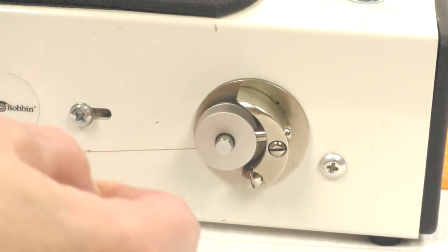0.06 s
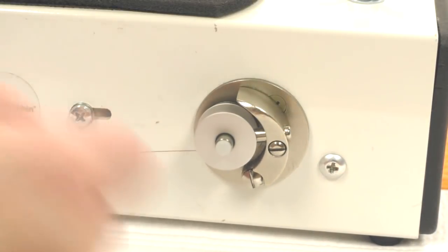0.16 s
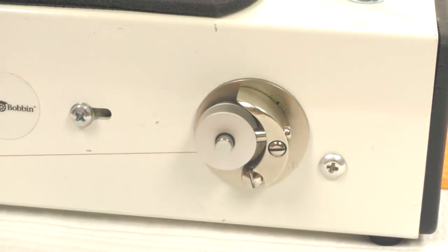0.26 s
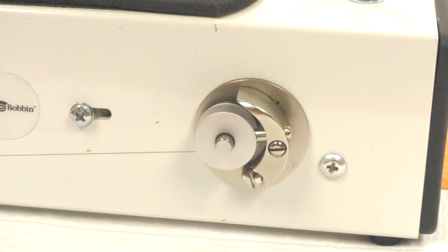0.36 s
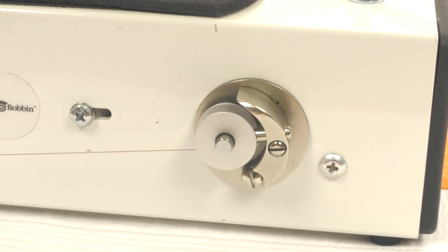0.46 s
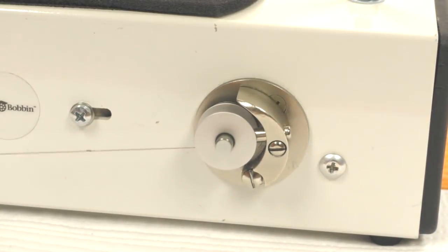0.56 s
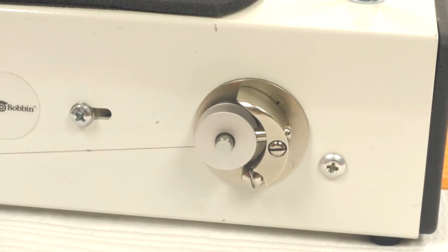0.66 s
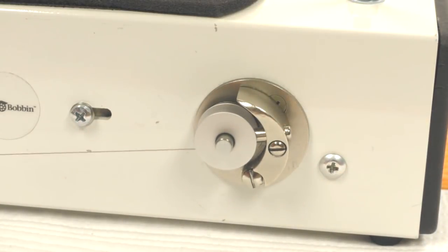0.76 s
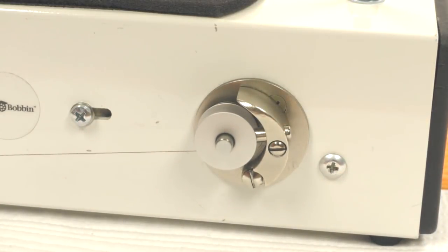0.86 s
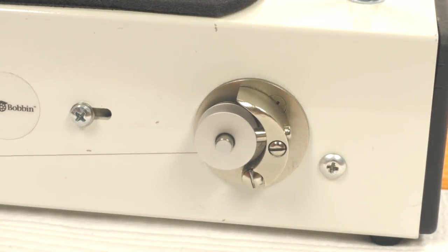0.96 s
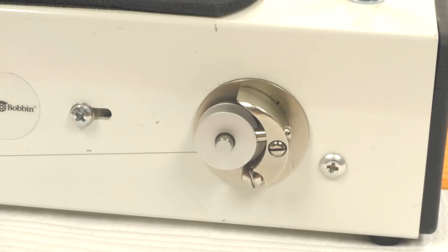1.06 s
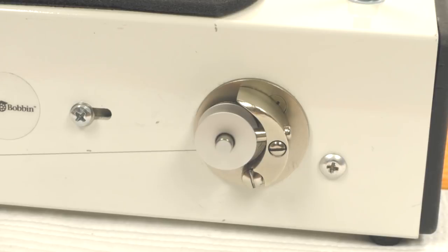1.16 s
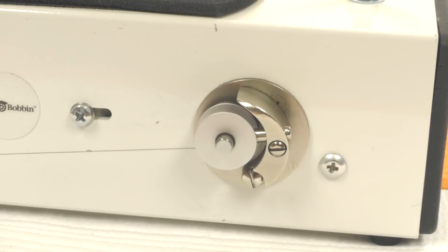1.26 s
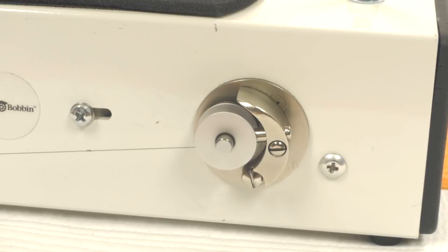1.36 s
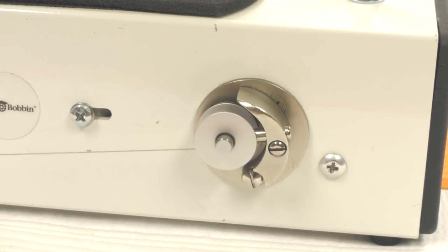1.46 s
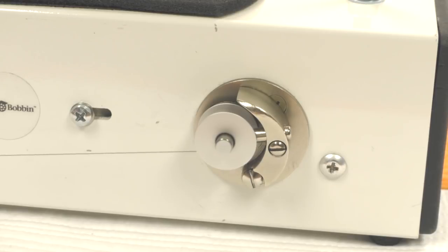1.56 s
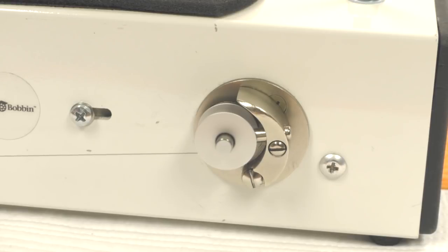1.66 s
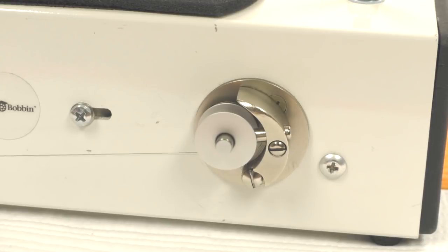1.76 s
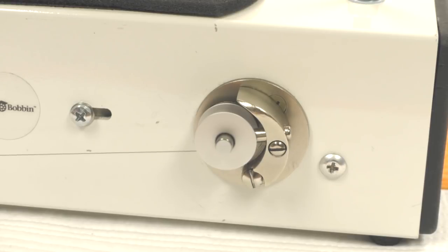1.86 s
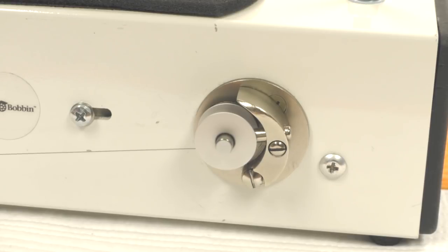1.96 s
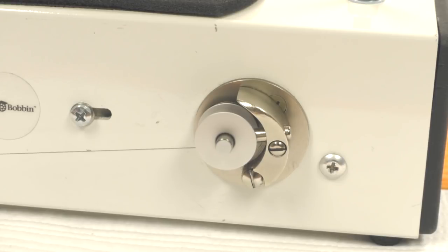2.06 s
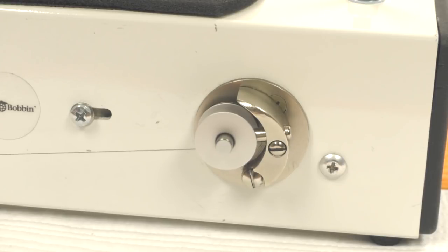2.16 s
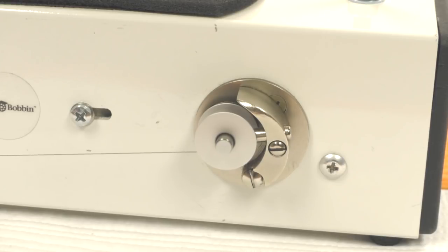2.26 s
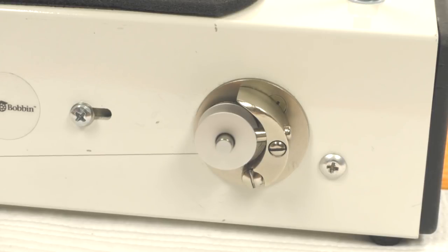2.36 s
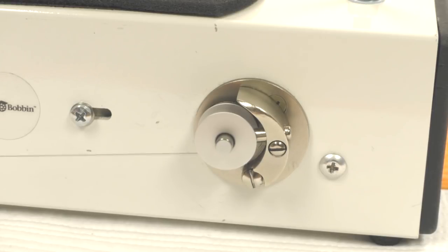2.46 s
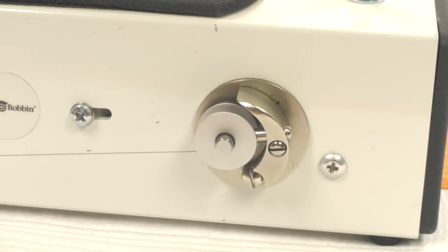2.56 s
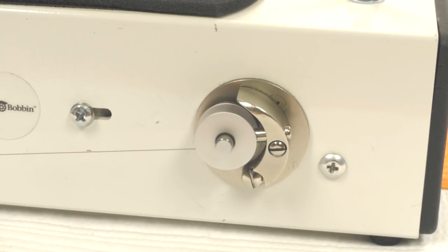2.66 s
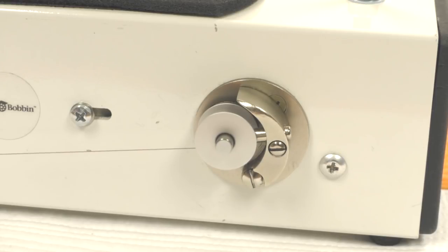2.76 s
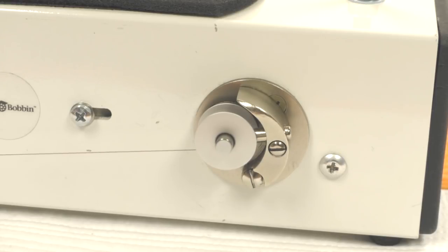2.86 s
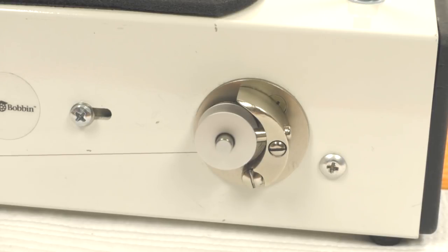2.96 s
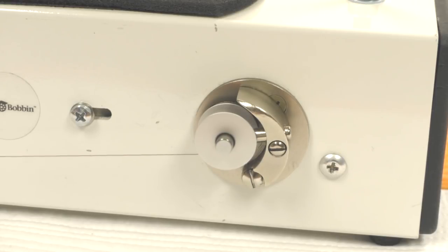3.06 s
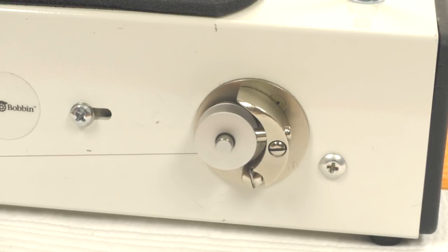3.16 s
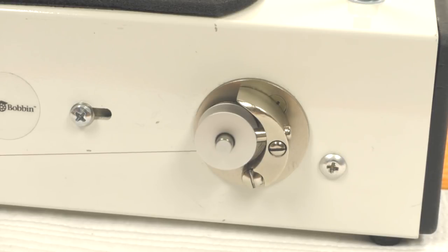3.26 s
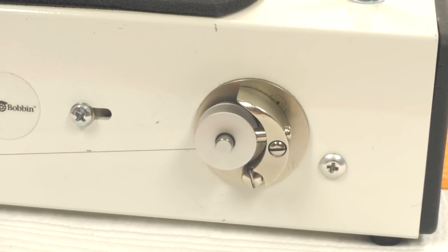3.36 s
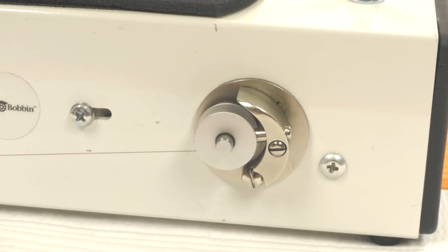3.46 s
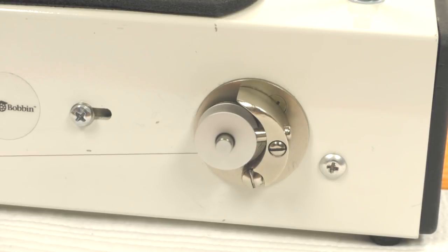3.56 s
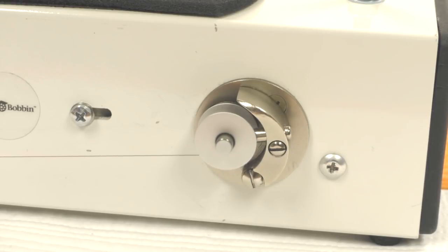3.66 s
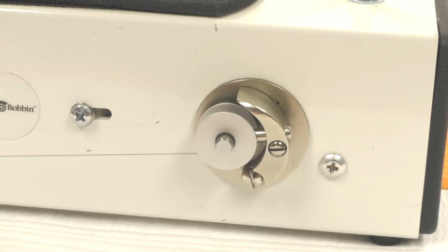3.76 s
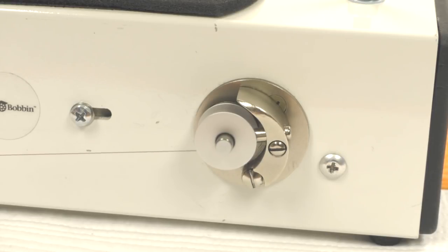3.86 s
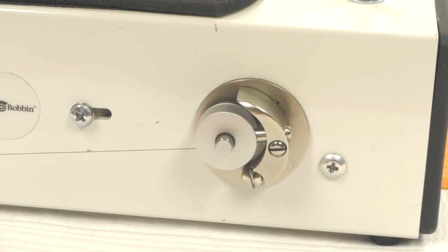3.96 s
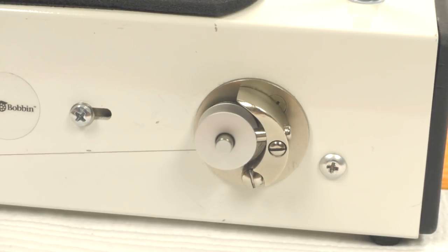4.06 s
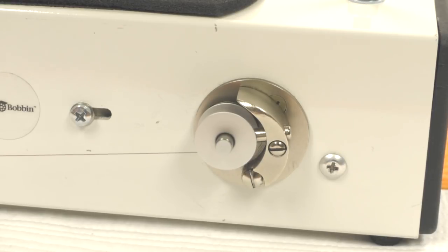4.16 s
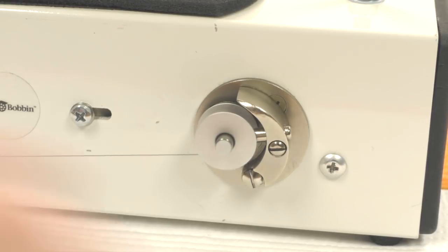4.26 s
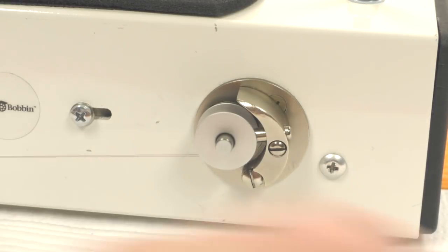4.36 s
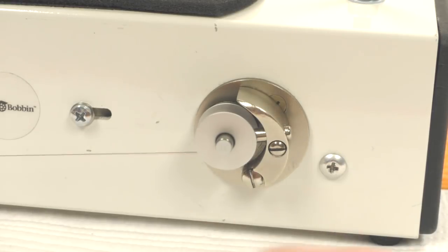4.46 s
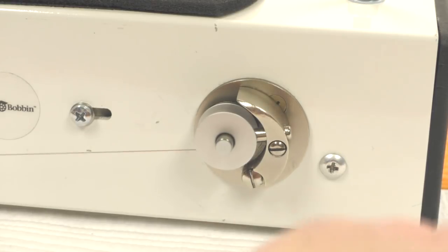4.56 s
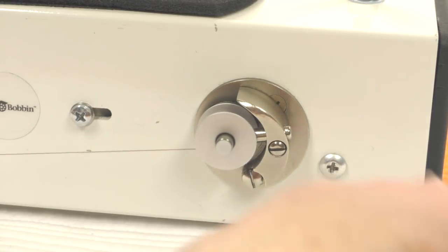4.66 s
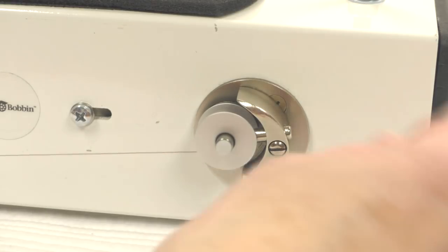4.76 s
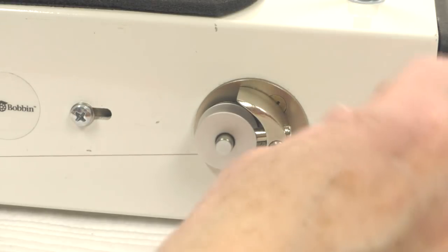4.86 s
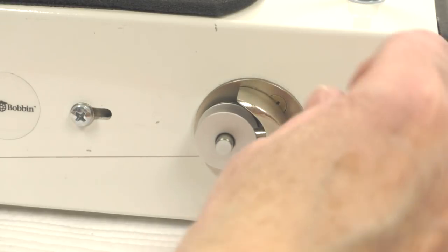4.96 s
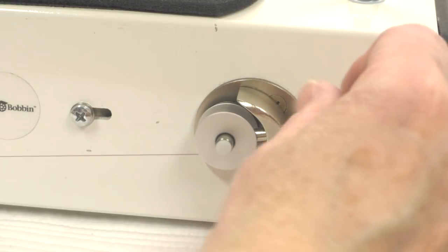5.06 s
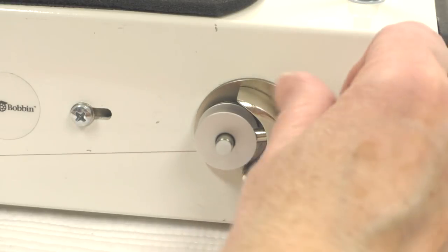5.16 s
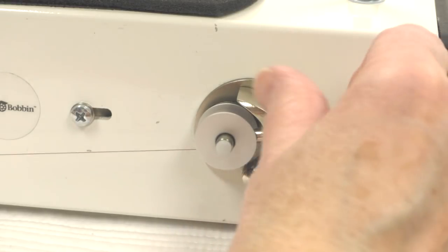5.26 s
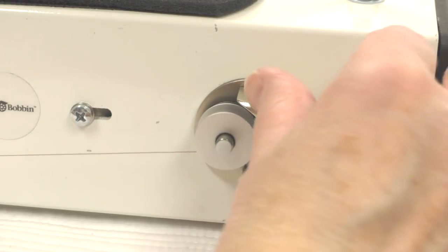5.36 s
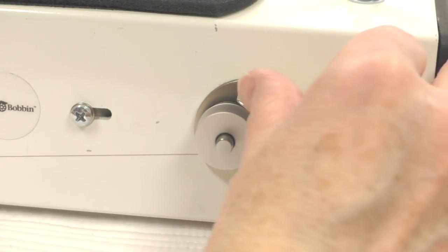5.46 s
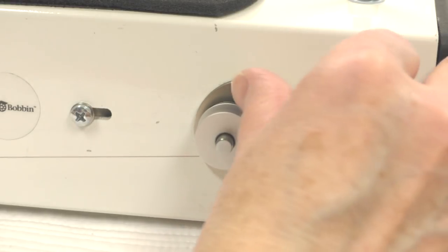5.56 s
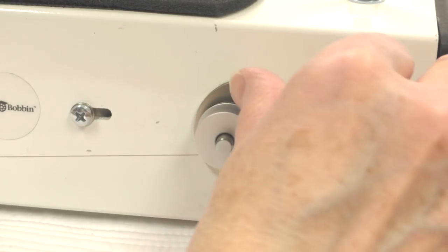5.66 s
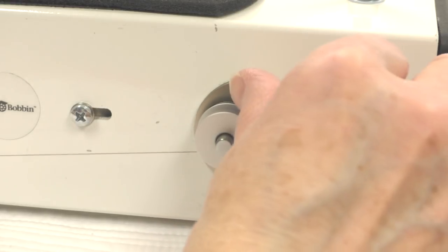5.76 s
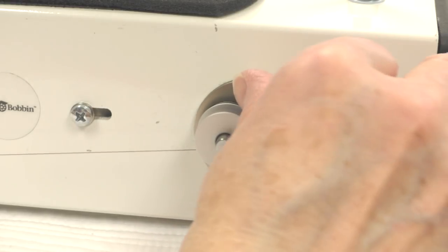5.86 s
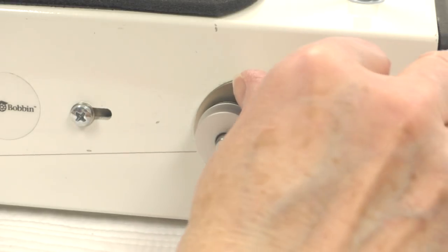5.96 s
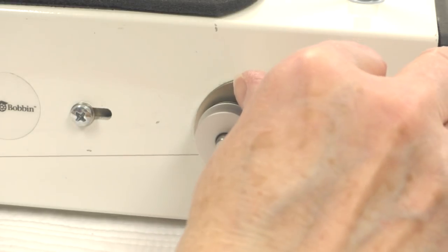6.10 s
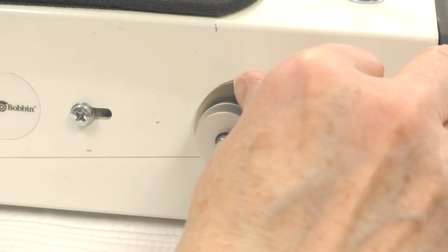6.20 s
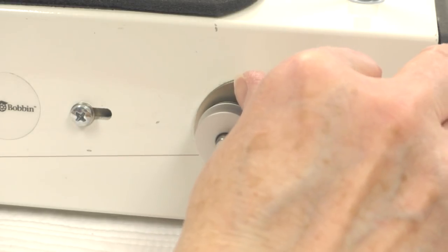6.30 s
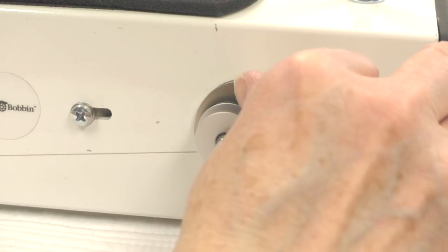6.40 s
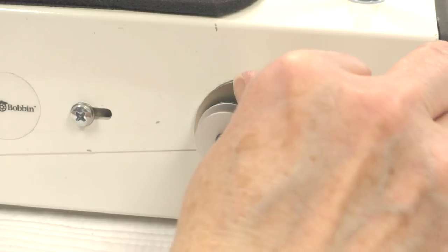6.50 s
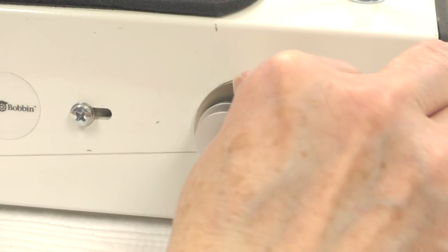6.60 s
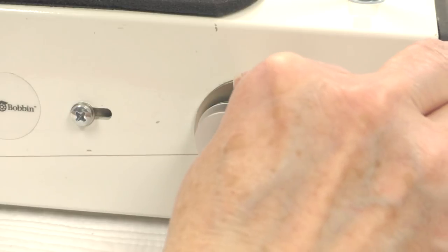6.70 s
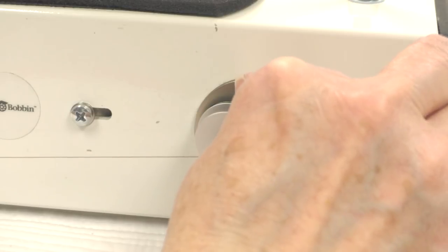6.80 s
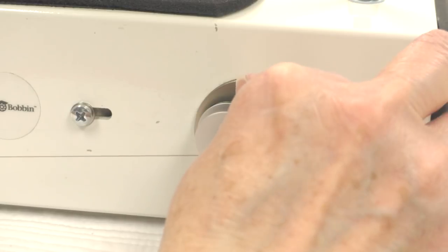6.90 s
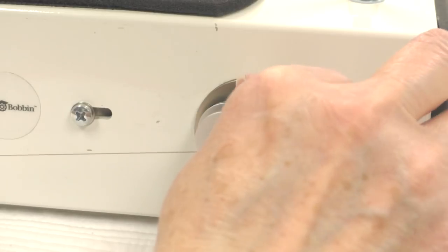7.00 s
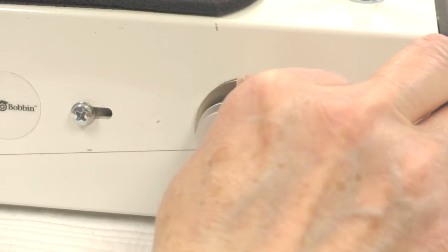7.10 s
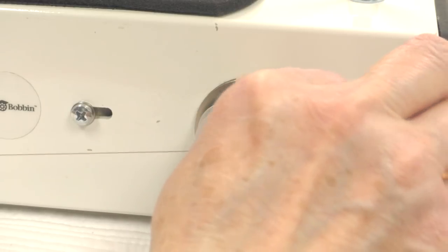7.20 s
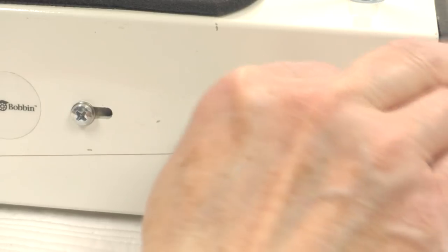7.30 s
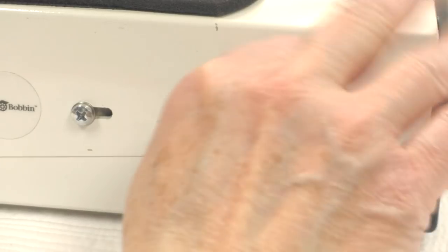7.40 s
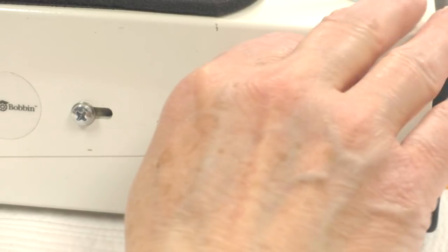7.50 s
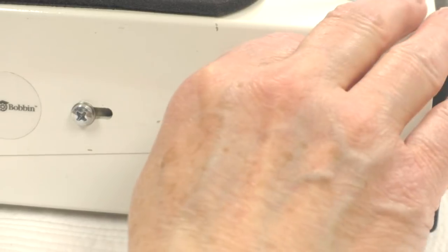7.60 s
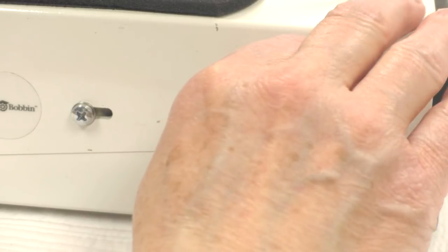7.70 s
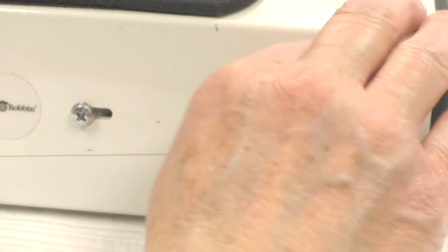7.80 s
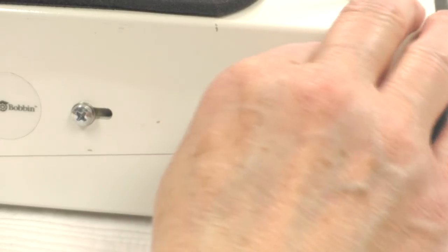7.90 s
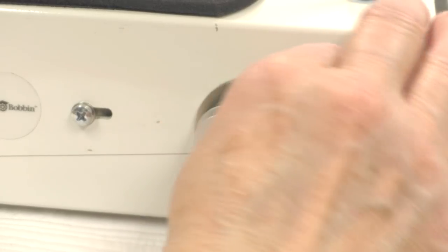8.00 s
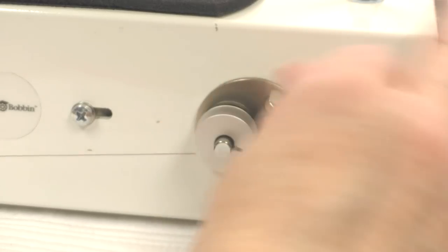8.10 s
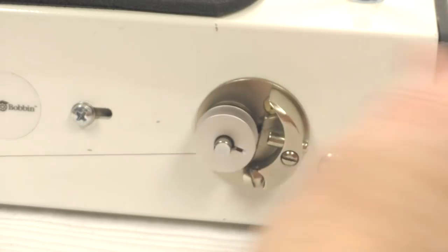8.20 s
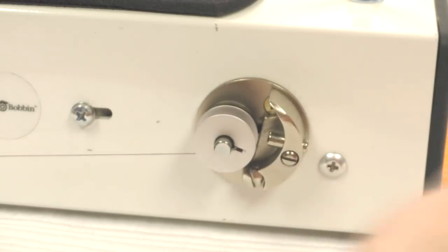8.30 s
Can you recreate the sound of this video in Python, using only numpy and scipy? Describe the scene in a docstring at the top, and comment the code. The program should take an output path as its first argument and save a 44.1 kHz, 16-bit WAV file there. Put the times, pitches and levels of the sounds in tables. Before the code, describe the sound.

Steady metallic motor whir with fine rattle and pulsing, gritty thread buzz, a few light knocks, then a sharp clack and falling whine.

```python
"""A belt-driven bobbin winder whirs close by, its bearings rattling in a sheet-metal case as it slowly gains speed.
Thread hisses through its guide and ticks once per spindle turn each time it sweeps across the bobbin.
Loose parts knock, skin brushes, hands bump the machine now and then, and one comes to rest on the trip lever.
The lever snaps over, the power is cut and the motor coasts down with a thin falling whine.
Behind it all lie a low rumble, still room air and a faint high tone."""
import sys
import numpy as np
from scipy import signal
from scipy.fft import rfft, irfft, next_fast_len
from scipy.io import wavfile
from scipy.ndimage import map_coordinates

SR = 44100
rng = np.random.default_rng(int(sys.argv[2]) if len(sys.argv) > 2 else 0)


def generate_wav(sig):
    """Save sig (samples, or channels by samples) to the path in sys.argv[1] as 16-bit PCM at SR."""
    pcm = np.round(np.clip(np.atleast_2d(sig).T, -1, 1) * 32767).astype(np.int16)
    wavfile.write(sys.argv[1], SR, pcm)


N = 367838
TIME = np.arange(N) / SR  # seconds

# The thread sweeps across the bobbin.
# Each row: middle in seconds, length in seconds, relative level of the ticks in dB.
SWEEPS = [(0.08, 0.32, -53), (0.71, 0.55, -52.5), (1.442, 0.56, -52), (2.12, 0.53, -51.5),
          (2.84, 0.5, -51.5), (3.457, .3, -51), (4.046, 0.36, -49), (4.58, 0.27, -53.5), (5.333, 0.32, -54),
          (6.003, 0.55, -50), (6.573, 0.41, -48.5), (7.174, 0.4, -52), (7.783, .2, -49)]

# Smooth changes that several sounds share: (start, length) in seconds
TOUCH = (3.62, 2.14)  # the hand settles on the machine
PRESS = (4.65, .3)  # it bears on the lever


def shaft_speed():
    """Turns per second: a slow climb under power, steady braking after the cut."""
    cut_s = 7.85
    start_hz, creep_hz_per_s, braking_hz_per_s = 205.3, 2.14, 154
    start_lag_hz, settle_s = 3.4, .2  # a little slow just after the start
    powered = np.minimum(TIME, cut_s)
    lag = start_lag_hz * np.exp(-powered / settle_s)
    return start_hz + creep_hz_per_s * powered - lag - braking_hz_per_s * (TIME - powered)


def rattle(turns, lap_share=.52, scatter_db=4.4, hits_per_lap=300):
    """Tiny impacts ring the case: some repeat with each lap of the belt, the rest fall by chance."""
    # How the case responds. Each row: pitch in Hz, relative level in dB.
    case_response = [(120, -37), (320, -32.5), (385, -17), (480, -28.5), (570, -12), (740, -14), (880, -13),
                     (1040, -4.5), (1370, -15.5), (1560, -2.5), (1830, 1), (2120, -10), (2480, -25.5),
                     (4400, -54.5)]
    belt = turns * .1083  # belt laps per shaft turn
    laps = np.arange(int(belt[-1]) + 1)[:, None]
    # Every lap has its hits at the same places, with sizes that vary somewhat
    places = laps + rng.random(hits_per_lap)
    place_db = 3.4 * rng.standard_normal(hits_per_lap)
    lap_db = 3.5 * rng.standard_normal(places.shape)
    bumps = rng.choice([-1, 1], hits_per_lap) * amp(place_db + lap_db)
    repeating = unit(impulses(belt, places.ravel(), bumps.ravel()))
    # As many more fall anywhere
    loose_db = scatter_db * np.clip(rng.standard_normal(places.size), -3, 3)
    sizes = rng.choice([-1, 1], places.size) * amp(loose_db)
    loose = unit(impulses(belt, rng.random(places.size) * belt[-1], sizes))
    tension = amp(0.95 * np.sin(4 * np.pi * belt))  # the belt tightens twice a lap
    mixed = lap_share * repeating + np.sqrt(1 - lap_share ** 2) * loose
    return coloured(tension * mixed, case_response)


def bearings(turns):
    """Rolling tones that waver as the balls slip and change balance under the hand."""
    # Tones of the bearings and spindle. Each row: multiple of the shaft rate,
    # level in dB against the rattle when running free, level in dB under the hand.
    rolling_tones = [(.87, -44.5, -40.5), (1.739, -33, -40.5), (2.087, -32.5, -38), (2.6, -26, -33),
                     (2.708, -23.5, -23.5), (3.02, -24, -30), (3.56, -23.5, -32), (3.79, -28, -28.5),
                     (4.54, -25, -21), (4.655, -32, -25.5), (5.3, -19, -27.5), (6.82, -19, -39),
                     (7.25, -20, -24), (7.67, -22, -14), (8.33, -22, -24), (8.66, -18, -11),
                     (8.78, -13, -25)]
    held, out = change(*PRESS), np.zeros(N)
    for multiple, free_db, held_db in rolling_tones:
        level = amp(free_db + (held_db - free_db) * held + 2.66 * wobble(5))
        phase = 2 * np.pi * multiple * turns + .5 * wobble(9)
        out += np.sqrt(2) * level * np.sin(phase)
    return out


def rattle_level(drift_db=0.27):
    """The case rattles harder while fingers hold the thread taut or bear on the lever; a fuller bobbin calms it."""
    rattle_db, calming_db_per_s = -31, 0.1853
    taut_db, pressed_db, push_db = 1.5, 3.7, 2  # what each adds
    let_go = change(0.39, .14)  # the fingers release the thread
    push = change(4.99, 0.47) * (1 - change(5.38, 0.42))  # one firm push, then it relaxes
    free_db = rattle_db - calming_db_per_s * TIME + drift_db * wobble(4.01)
    return amp(free_db + taut_db * (1 - let_go) + pressed_db * change(*PRESS) + push_db * push)


def engagement(slip_s=.014):
    """The drive is at 1 while engaged; when it lets go it drops at once, then dies away."""
    release_s, drop_db, fade_db_per_s = 7.862, 6, 210
    since = np.maximum(TIME - release_s, 0)
    return amp(-drop_db * change(release_s, slip_s) - fade_db_per_s * since)


def whine(turns, speed, count=80):
    """Harmonics of the shaft, each with its own random rise and fall in level as its pitch glides."""
    # Hum at twice the shaft rate. Each row: time in seconds, level in dB.
    hum_level = [(0, -43), (.9, -49), (2, -47), (4, -55), (7.8, -55.5), (8.34, -77)]
    # Typical strength of a harmonic. Each row: pitch in Hz, level in dB.
    whine_level = [(200, -71), (430, -82), (580, -58), (750, -70), (1250, -76), (1650, -63.5),
                   (1950, -68.5), (2400, -74.5), (3000, -81), (4700, -99), (6500, -87), (9300, -81),
                   (11000, -104), (15800, -103)]
    # Commutator harmonics set apart from the rest.
    # Each row: multiple of the shaft rate, extra level in dB.
    slots = [(3, 6.5), (4, -0.5), (8, 7.5), (9, -3), (10, -1), (11, 8.5), (12, 10), (13, 8.5), (14, -3),
             (15, -4), (16, 4), (17, 3), (18, -3), (19, 1), (20, -3), (21, -4), (22, -4), (24, 11),
             (36, 10), (48, 4)]
    extra = {round(k): db for k, db in slots}
    hum_amp = amp(curve(hum_level) + 0.76 * wobble(8.8))
    tone = np.sqrt(2) * hum_amp * np.sin(4 * np.pi * turns)
    coarse = slice(None, None, SR // 100)  # levels are worked out 100 times a second
    grid = np.arange(0, SR / 2, 170)  # Hz from one random level to the next
    depth_db = np.interp(grid, [600, 1500, 3000], [1, 4, 5.5])
    for k in range(1, count + 1):
        hz = k * speed[coarse]
        # a fresh random set of levels against pitch for each harmonic
        ripple = depth_db * np.clip(rng.standard_normal(len(grid)), -2, 1.2)
        own_db = extra.get(k, rng.uniform(-6, 3))
        level = amp(along(whine_level, hz) + own_db + np.interp(hz, grid, ripple))
        wave = np.sin(2 * np.pi * (k * turns + rng.random()))
        tone += np.sqrt(2) * np.interp(TIME, TIME[coarse], level) * wave
    return tone


def thread_hiss(grain_db=3.0):
    """Thread rubs through its guide; the colour shifts as the bobbin fills and the lever bears on it."""
    # Hiss on the nearly bare bobbin, the half full one, and under the hand.
    # Each row: pitch in Hz, relative level in dB.
    bare_hiss = [(1500, 0), (2600, 10), (3250, -6.5), (3650, 1.5), (4200, 0.5), (5100, 4.5), (5800, 5),
                 (7200, 7.5), (8200, -2), (9300, -5), (10500, -13), (13500, -29), (15800, -33)]
    half_hiss = [(1500, -4), (2600, -11), (3100, -1.5), (3500, 1), (4100, -7.5), (4900, 1.5), (5800, -4),
                 (8400, 2.5), (9200, -3.5), (10200, -31), (14000, -29), (15800, -20)]
    held_hiss = [(1500, -10.5), (2600, 9), (3050, 3), (3450, 4.5), (4500, -6), (4950, 1), (5900, -3.5),
                 (7550, 5.5), (9100, 1.5), (10500, -14), (12200, -18), (13300, -28), (15800, -20)]
    # Narrow peaks and dips of the case and plate. # Each row: pitch in Hz, width in Hz, level in dB against the
    # hiss.
    case_peaks = [(3040, 66, 4.5), (3120, 85, -0.5), (3430, 240, 5), (3400, 59, 2), (4950, 120, 3.5),
                  (5500, 150, 2.5), (6300, 140, 3.5), (6860, 180, 2.5), (7500, 190, 1.5), (8600, 220, 2)]
    rub = rng.standard_normal(N) * amp(grain_db * wobble(1500))
    peaks = np.zeros(N)
    for hz, width, db in case_peaks:
        b, a = signal.iirpeak(hz, hz / width, SR)
        peaks += (amp(db) - 1) * signal.lfilter(b, a, rub)
    rub = rub + peaks
    # The same rubbing, shifted in time so that the three do not line up
    bare = amp(-48.5) * coloured(rub, bare_hiss)
    half = amp(-51.5) * coloured(np.roll(rub, SR), half_hiss)
    pressed = amp(-43.5) * coloured(np.roll(rub, 2 * SR), held_hiss)
    sweeping = sum(swell(s, length) for s, length, _ in SWEEPS)
    sweep_gain = amp(0.3 * (sweeping - .5))  # slightly louder at the height of a sweep
    return sweep_gain * np.sum(stages() * [bare, half, pressed], axis=0)


def thread_ticks(turns, tick_t60=0.0014, width_hz=1100, skirt_db=-4, drag=0.04, uneven_db=0.5, hand_uneven_db=4.8):
    """The thread drags and flicks once per spindle turn while it sweeps the bobbin, less evenly under the hand."""
    # Top edge of the flicks on the bare bobbin, the filled one, and under the hand.
    # Each row: pitch in Hz, relative level in dB.
    edge_bare = [(6000, -18), (9400, 4), (11000, -9), (13000, -6), (14500, -16), (15800, -3)]
    edge_full = [(6000, -17), (9400, -5), (10600, -37), (11800, -25), (13500, 2), (15700, 44)]
    edge_held = [(6000, -10.5), (9400, 9), (11000, -3.5), (12200, -3), (13300, -14), (14500, -7),
                 (15700, -1)]
    # Per stage: pitch of the flick's ring in Hz, then level of its bright edge in dB against the ring.
    ring_pitches = [7180, 8220, 7720]
    edge_levels = [-7, -10, -6]
    spindle = turns * .3478  # pulley ratio
    at = np.arange(int(spindle[-1]))
    unevenness_db = uneven_db + hand_uneven_db * np.interp(at, spindle, change(*TOUCH))
    flick_db = unevenness_db * np.clip(rng.standard_normal(len(at)), -2, 1.6)
    flicks = impulses(spindle, at, amp(flick_db))
    t = np.arange(SR // 50) / SR
    fading = signal.fftconvolve(flicks, amp(-60 * t / tick_t60))[:N]
    bursts = (drag + fading) * rng.choice([-1, 1], N)  # gritty noise
    ticks = np.zeros(N)
    edges = [edge_bare, edge_full, edge_held]
    for gain, ring_hz, edge_db, edge in zip(stages(), ring_pitches, edge_levels, edges):
        ring = unit(band(flicks, ring_hz, width_hz)) + unit(band(bursts, ring_hz, width_hz))
        ring += amp(skirt_db) * unit(band(bursts, ring_hz - 800, 2000))  # wider noise a little lower
        ticks += gain * (unit(ring) + amp(edge_db) * coloured(bursts, edge))
    return ticks * sum(amp(db) * swell(s, length) for s, length, db in SWEEPS)


def lever_trip():
    """The lever trips and bounces: hard contact gives a loud crack and stirs the high tones of the plate."""
    # Each row: start in seconds, peak level in dB.
    lever_blows = [(7.8392, -15), (7.8433, -4), (7.8468, -17), (7.8535, -15), (7.8592, -21), (7.863, -23)]
    return strikes(lever_blows, crack_db=-4, soft_hz=14000, damping=1.54)


def knocks():
    """Loose parts knock: softer contact gives a faint crack and spares the high tones of the plate."""
    # Each row: start in seconds, peak level in dB before the 6 dB cut below.
    loose_knocks = [(0.1186, -13), (0.188, -11.5), (0.3125, -13), (0.37, -14), (0.412, -11.5),
                    (0.4554, -16), (1.5893, -11.5), (2.0971, -11.5), (5.1207, -9.5), (5.7064, -17),
                    (6.4517, -12)]
    return amp(-6.0) * strikes(loose_knocks, crack_db=-28, soft_hz=2200, damping=1.5)


def strikes(rows, crack_db, soft_hz, damping):
    """Blows on the lever and plate: a short crack and ringing tones; soft contact spares the high ones."""
    # Ringing tones of the lever and its plate. Each row: pitch in Hz, relative level in dB,
    # seconds to fade by 60 dB before damping shortens it.
    steel_modes = [(615, -25, 0.096), (995, -18, 0.054), (1630, -21, 0.027), (1770, 5, 0.041),
                   (1835, -9.5, 0.08), (3110, -18.5, 0.036), (4940, -28, 0.016), (6730, -10.5, 0.029),
                   (7510, -3, 0.024), (8970, -5, 0.011)]
    crack_colour = [(300, -7.5), (1800, 4.5), (4000, -9.0), (7800, -4.5), (10500, -16), (15800, -22)]  # Hz, dB
    out, t = np.zeros(N), np.arange(SR // 4) / SR
    crack = coloured(rng.standard_normal(N), crack_colour)
    for s, db in rows:
        ring = np.zeros(len(t))
        for hz, level, t60 in steel_modes:
            # each blow lands a little differently
            strength = amp(level + rng.normal(0, 1.4) - 60 * damping * t / t60) / (1 + (hz / soft_hz) ** 2)
            ring += strength * np.sin(2 * np.pi * hz * rng.normal(1, 0.039) * t)
        snippet = crack[rng.integers(N - len(t)):][:len(t)]
        onset = 1 - np.exp(-t / 0.00069)
        blow = (ring + amp(crack_db - 60 * t / 0.016) * snippet) * onset
        add(out, s, amp(db) * blow / np.abs(blow).max())
    return out


def brushes():
    """Skin brushes the lever and the case: soft swells of finely gritty friction."""
    # Each row: middle in seconds, length in seconds, level in dB before the swell shapes it,
    # centre in Hz, width in Hz.
    skin_brushes = [(4.094, 0.63, -52, 5200, 1400), (4.6, 0.38, -63, 10300, 1400),
                    (4.8, .3, -67, 15200, 1400), (5.27, .7, -65, 12900, 2600), (8.191, .09, -56, 440, 220)]
    out = np.zeros(N)
    for s, length, db, hz, width in skin_brushes:
        size = int(length * SR)
        grit = rng.standard_normal(size) * amp(3.3 * wobble(600)[:size])
        add(out, s - length / 2, amp(db) * np.hanning(size) * unit(band(grit, hz, width)))
    return out


def thumps(attack=0.0027):
    """Hands bump the machine and table now and then, and the plate gives one low swing just after the lever
    trips: soft contact only stirs a low, quickly damped swing."""
    # Each row: start in seconds, peak level in dB, pitch in Hz, seconds to fade by 60 dB.
    hand_bumps = [(.27, -48, 119, 0.16), (.5, -47, 69, 0.17), (.58, -41.5, 151, 0.12),
                  (0.859, -48, 140, 0.14), (4.38, -52, 75, .2), (5.49, -41, 51.7, 0.31),
                  (7.89, -45, 188, 0.21), (8.17, -45, 60, .15)]
    out, t = np.zeros(N), np.arange(SR // 2) / SR
    for s, db, hz, t60 in hand_bumps:
        swing = np.sin(2 * np.pi * hz * t) * amp(-60 * t / t60) * (1 - np.exp(-t / attack))
        add(out, s, amp(db) * swing / np.abs(swing).max())
    return out


def room():
    """Low rumble, swelling when the hands shift, over the still air of the room and a faint high tone."""
    # The hands shift. Each row: middle in seconds, length in seconds, rumble level in dB.
    hand_shifts = [(.04, 0.3, -44.5), (0.288, 0.17, -43.5), (0.524, 0.4, -45), (.83, 0.25, -51),
                   (4.218, 0.52, -52), (5.08, 0.54, -51.5), (5.52, 0.15, -48), (8.32, 0.22, -52)]
    # Colour of the low rumble, then of the room air. Each row: pitch in Hz, relative level in dB.
    low_colour = [(12, -17), (30, -0.5), (70, 0.5), (100, -8.5), (175, -10.5), (300, -9.5), (420, -36)]
    air_colour = [(60, -11), (400, -1), (900, 2), (1800, -1), (2800, -27), (4500, -22), (8700, -13),
                  (10500, -26), (15800, -20)]
    # the resting hand adds 2 dB, and the level drifts slowly by about 1 dB
    resting = amp(-60.5 + 2 * change(*TOUCH) + 1 * wobble(5))
    shifting = sum(amp(db) * swell(s, length) for s, length, db in hand_shifts)
    low_noise = coloured(rng.standard_normal(N), list(low_colour) + [(900, -70)])
    rumble = np.hypot(resting, shifting) * amp(1.5 * wobble(14)) * low_noise
    high_tone = amp(-87) * np.sin(2 * np.pi * 13668 * TIME + .8 * wobble(30))
    return rumble + high_tone + amp(-59) * coloured(rng.standard_normal(N), air_colour)


def stages():
    """Gains of the three stages at constant power: bare bobbin, half full, under the hand."""
    filled = change(1.65, .5)  # the first layers cover the bare bobbin
    held = change(*TOUCH)
    return np.sqrt([1 - filled, filled * (1 - held), filled * held])


def change(start, length):
    """A smooth step from 0 to 1."""
    return .5 - .5 * np.cos(np.pi * np.clip((TIME - start) / length, 0, 1))


def swell(middle, length):
    """A rise, hold and fall between 0 and 1."""
    edge = length / 3
    return change(middle - length / 2, edge) - change(middle + length / 2 - edge, edge)


def amp(db):
    """Decibels as a plain factor."""
    return 10 ** (np.asarray(db) / 20)


def unit(x):
    """x scaled to an average (rms) level of 1."""
    return x / np.sqrt(np.mean(x ** 2) + 1e-20)


def curve(rows):
    """Rows of (seconds, value) as one value per sample."""
    return np.interp(TIME, *np.transpose(rows))


def along(points, hz):
    """Read (Hz, value) points at any pitch, on a log axis."""
    f, v = np.transpose(points)
    return np.interp(np.log(hz + 1), np.log(f + 1), v)


def wobble(rate):
    """A smooth random curve through a fresh random value, rate times a second."""
    return map_coordinates(rng.standard_normal(int(N * rate / SR) + 4), [TIME * rate])


def coloured(x, points, size=4096):
    """x through a filter with the (Hz, dB) response that only rings after each input, at rms 1."""
    response_db = along(points, np.fft.rfftfreq(size, 1 / SR))
    # folding the cepstrum (the spectrum of the log spectrum) forward gives minimum phase
    cepstrum = irfft(np.log(amp(response_db)))
    cepstrum[1:size // 2] *= 2
    cepstrum[size // 2 + 1:] = 0
    ringing = irfft(np.exp(rfft(cepstrum)))
    return unit(signal.fftconvolve(x, ringing)[:N])


def band(x, centre_hz, width_hz, order=3):
    """x through one broad resonance."""
    edges = np.clip([centre_hz - width_hz / 2, centre_hz + width_hz / 2], 20, SR / 2 - 20)
    return signal.sosfilt(signal.butter(order, edges, 'band', fs=SR, output='sos'), x)


def impulses(turns, at, sizes):
    """One impulse wherever the turn count passes a value of at."""
    where = np.interp(at, turns, np.arange(N), right=N).astype(int)
    return np.bincount(where, sizes, N + 1)[:N]


def add(track, s, sound):
    """Mix a sound into the track at s seconds."""
    part = track[int(s * SR):][:len(sound)]
    part += sound[:len(part)]


def scene():
    """The shaft drives rattle, whine and thread until the lever trips and the motor coasts."""
    speed = shaft_speed()
    turns = np.cumsum(speed * (1 + .0005 * wobble(12))) / SR  # with a slight unsteadiness
    drive = rattle_level() * (rattle(turns) + bearings(turns))
    thread = thread_hiss() + amp(2) * thread_ticks(turns)
    running = engagement() * (drive + thread)
    hands = brushes() + thumps()
    return (running + whine(turns, speed) + lever_trip() + knocks() + hands + room())[None]


def record(dry):
    """Remove everything from 15850 Hz upward."""
    size = next_fast_len(N + SR // 2)
    kept = np.fft.rfftfreq(size, 1 / SR) < 15850
    return irfft(rfft(dry, size) * kept, size)[:, :N]


dry = scene()
out = record(dry)
generate_wav(out)
```